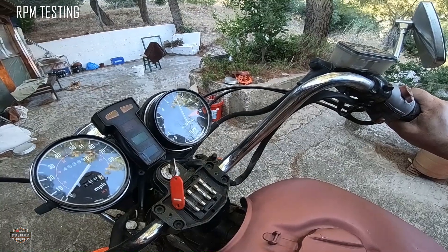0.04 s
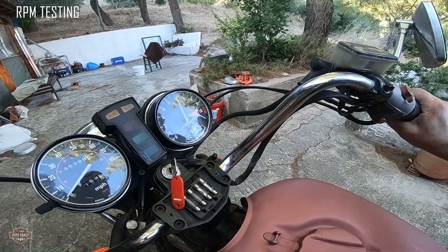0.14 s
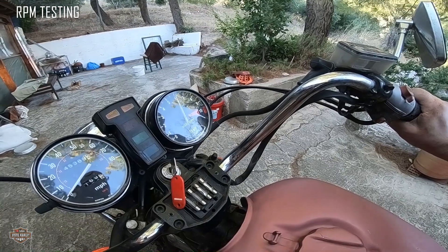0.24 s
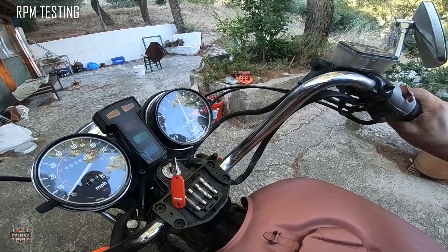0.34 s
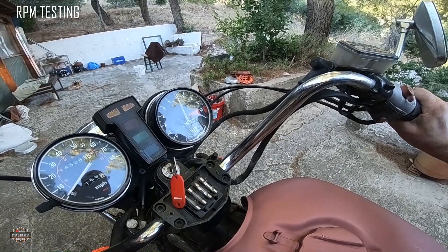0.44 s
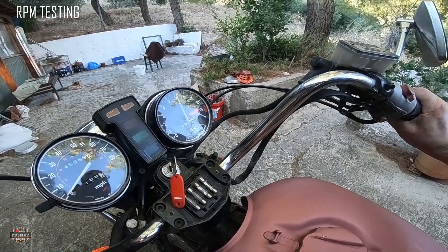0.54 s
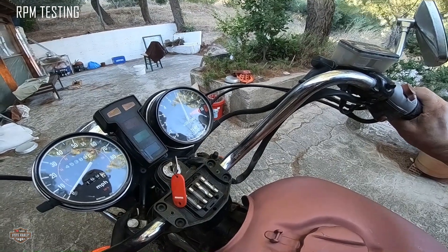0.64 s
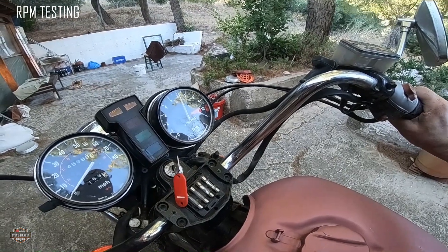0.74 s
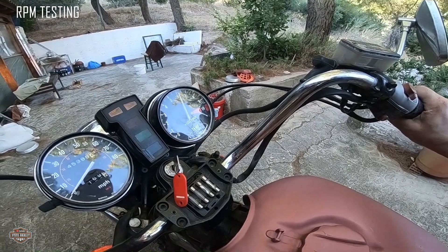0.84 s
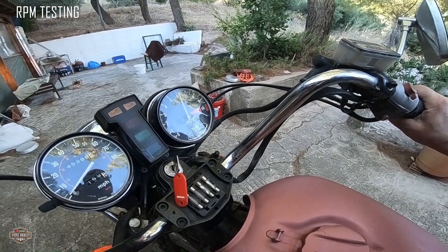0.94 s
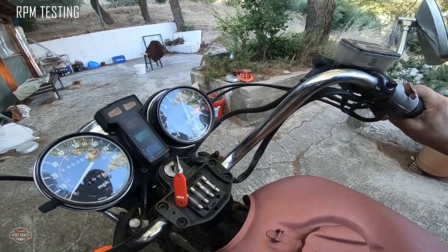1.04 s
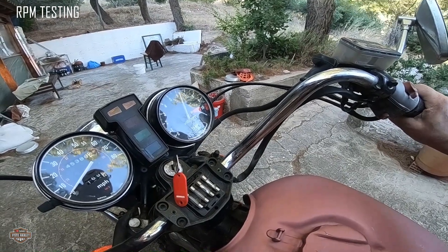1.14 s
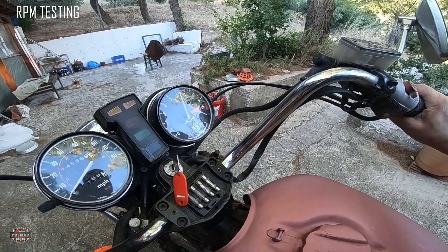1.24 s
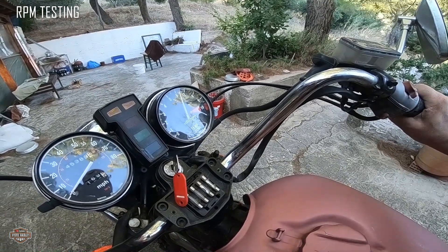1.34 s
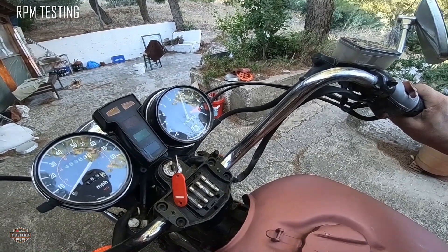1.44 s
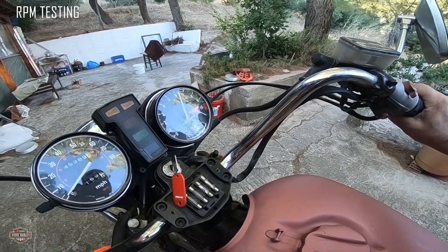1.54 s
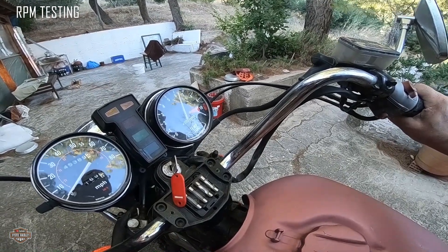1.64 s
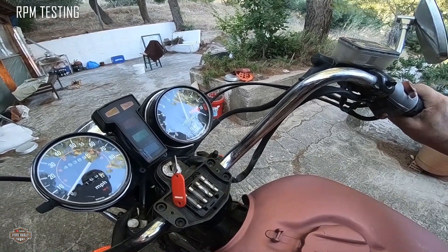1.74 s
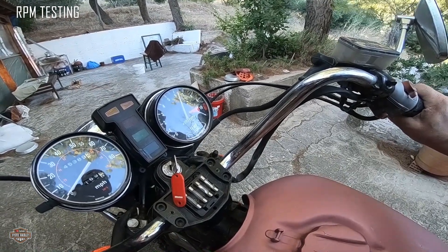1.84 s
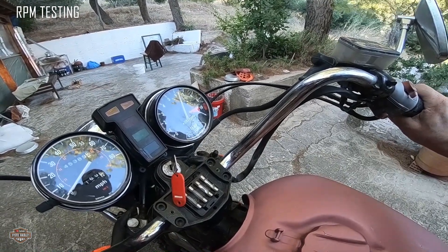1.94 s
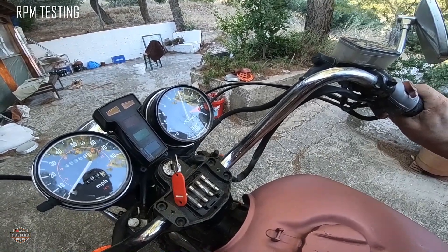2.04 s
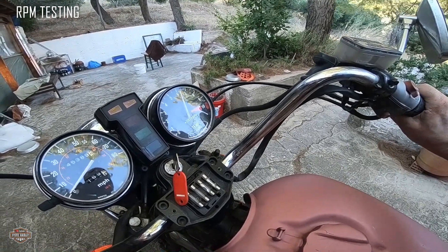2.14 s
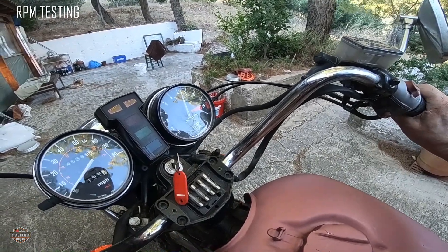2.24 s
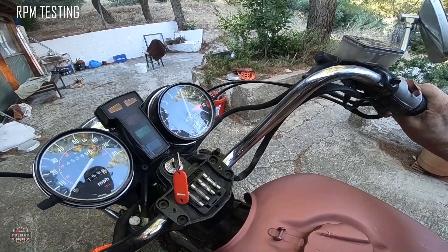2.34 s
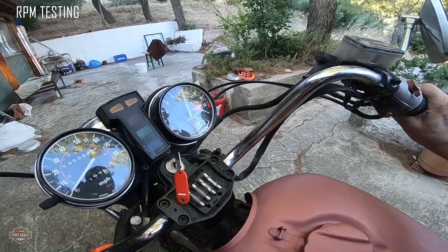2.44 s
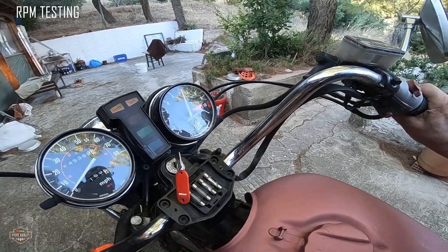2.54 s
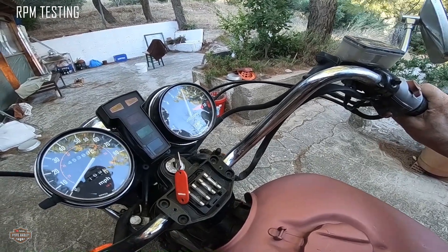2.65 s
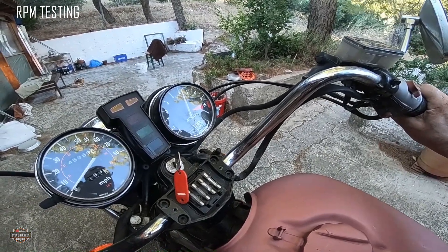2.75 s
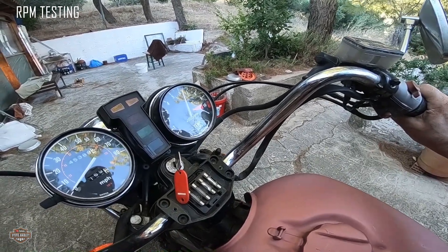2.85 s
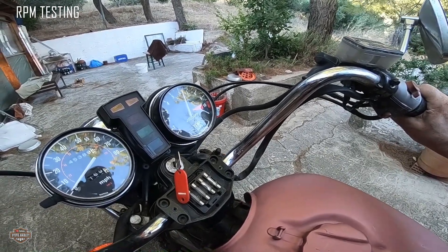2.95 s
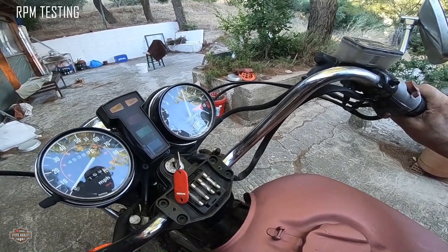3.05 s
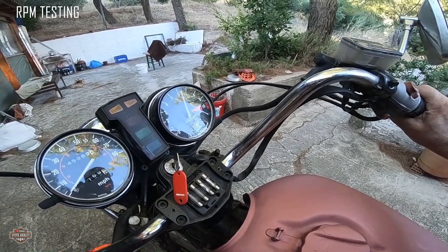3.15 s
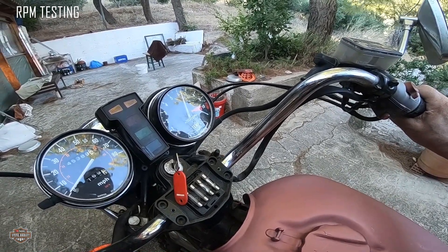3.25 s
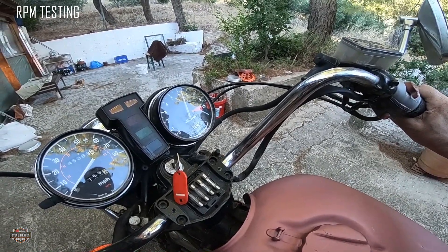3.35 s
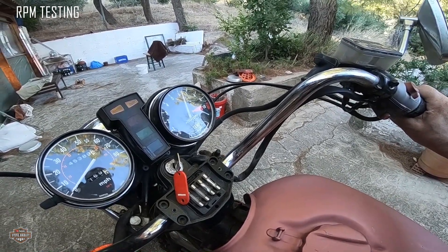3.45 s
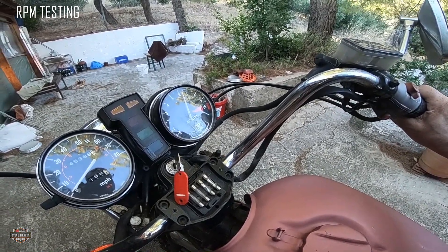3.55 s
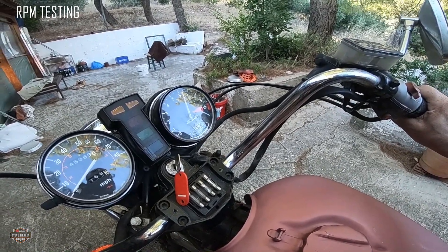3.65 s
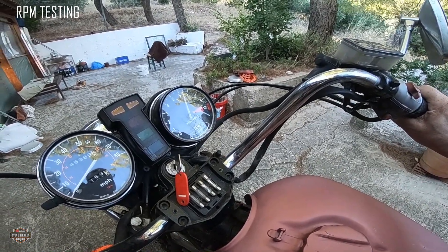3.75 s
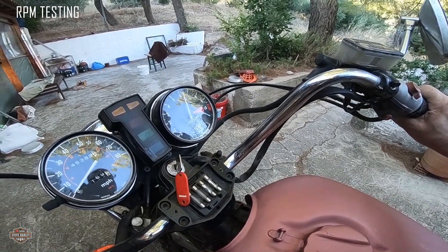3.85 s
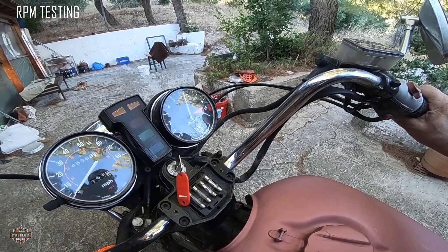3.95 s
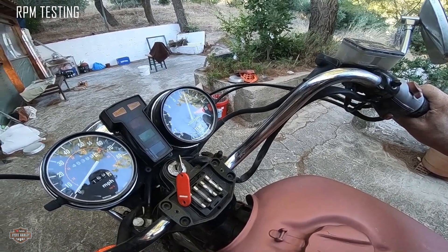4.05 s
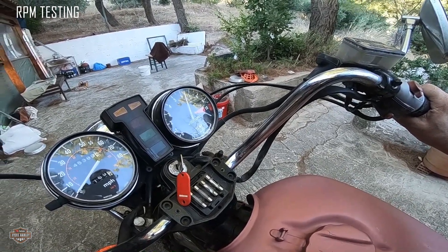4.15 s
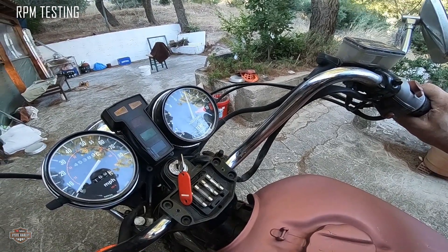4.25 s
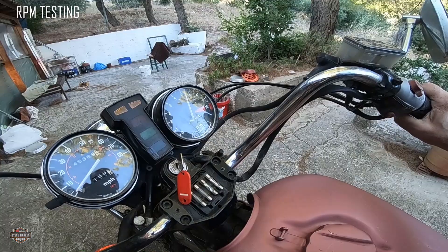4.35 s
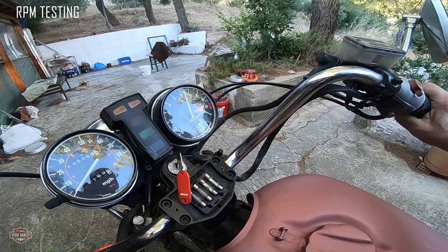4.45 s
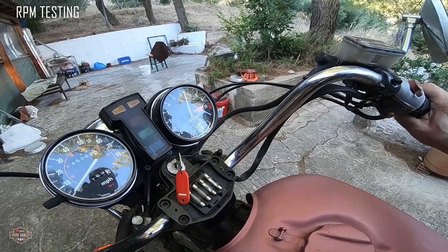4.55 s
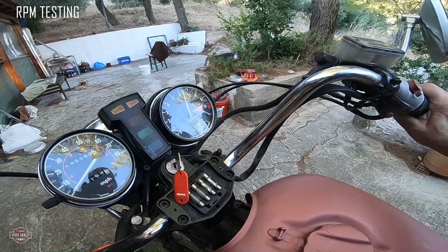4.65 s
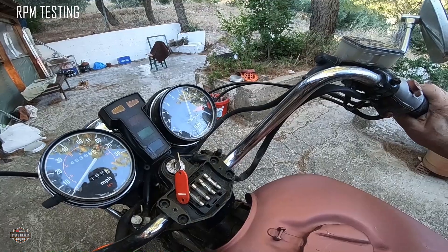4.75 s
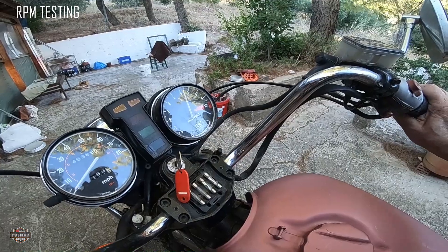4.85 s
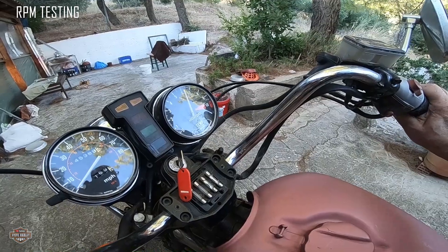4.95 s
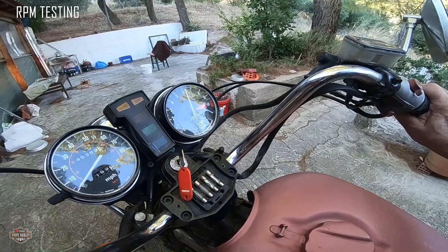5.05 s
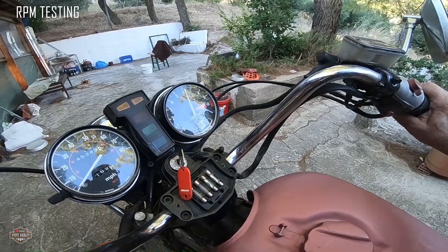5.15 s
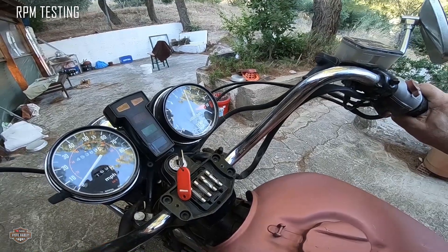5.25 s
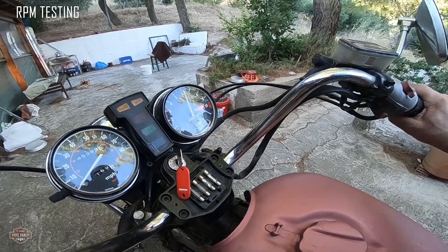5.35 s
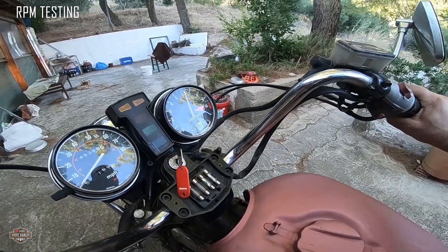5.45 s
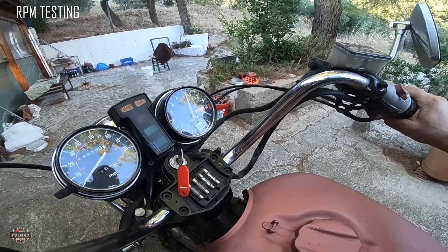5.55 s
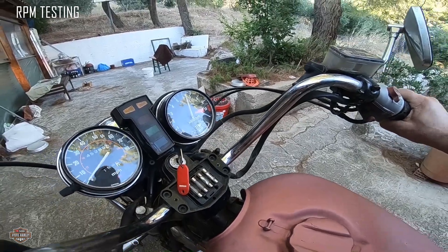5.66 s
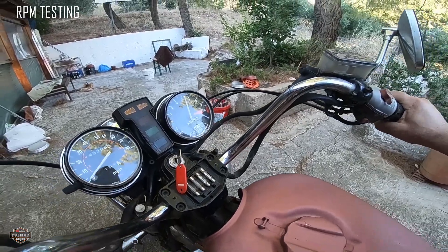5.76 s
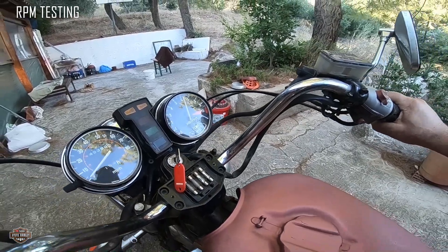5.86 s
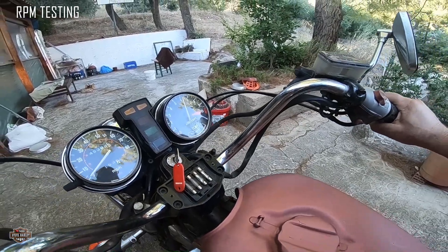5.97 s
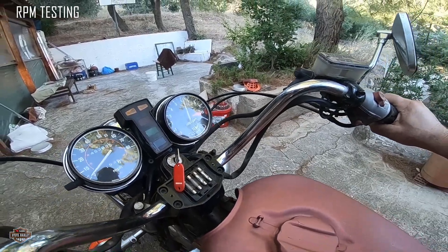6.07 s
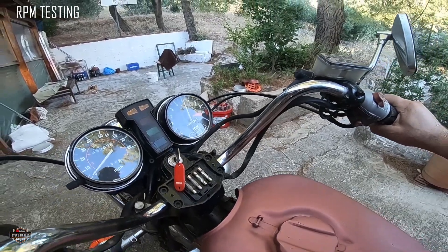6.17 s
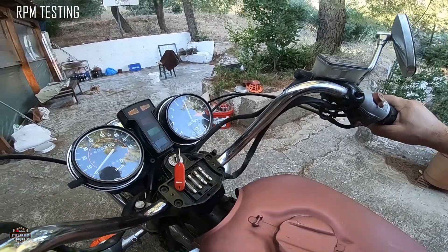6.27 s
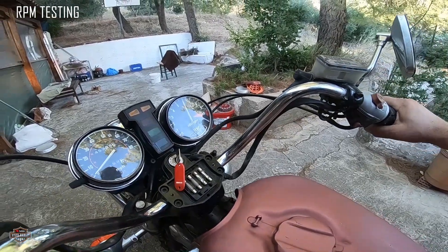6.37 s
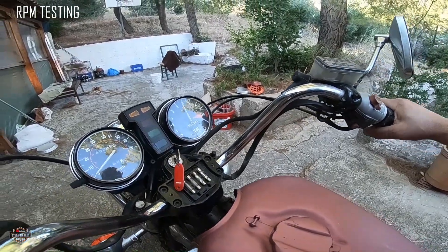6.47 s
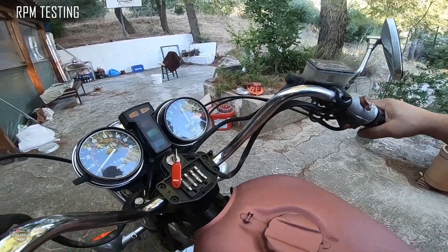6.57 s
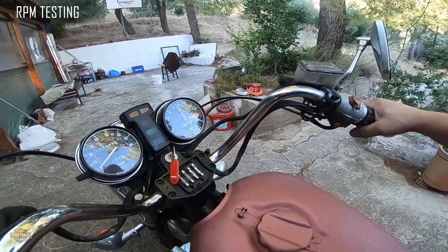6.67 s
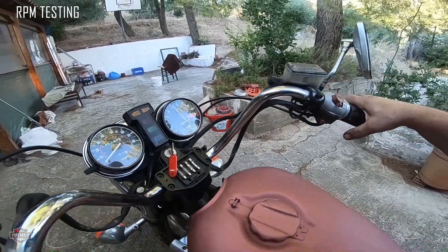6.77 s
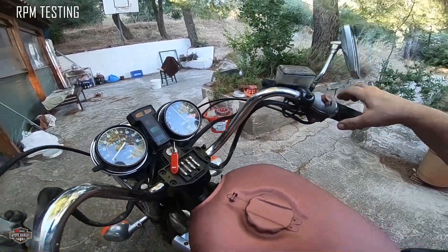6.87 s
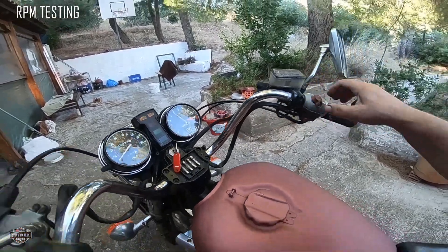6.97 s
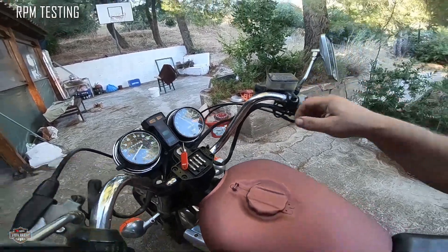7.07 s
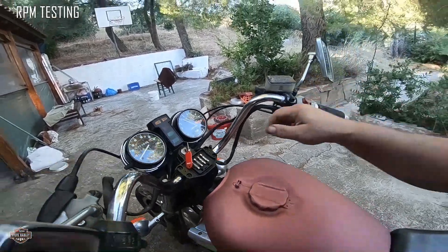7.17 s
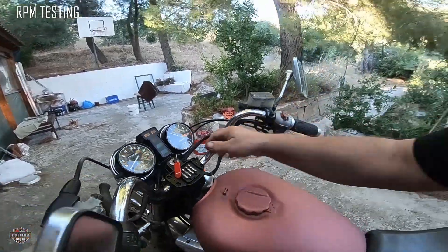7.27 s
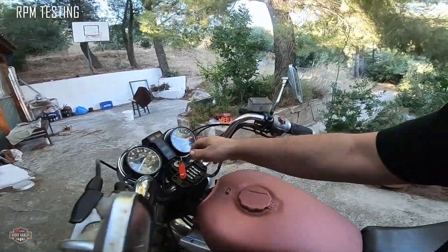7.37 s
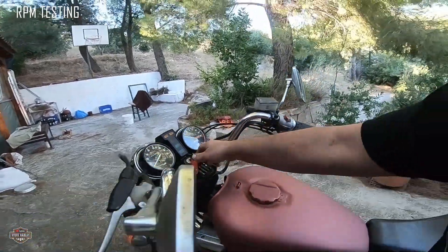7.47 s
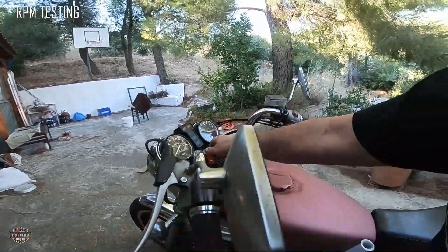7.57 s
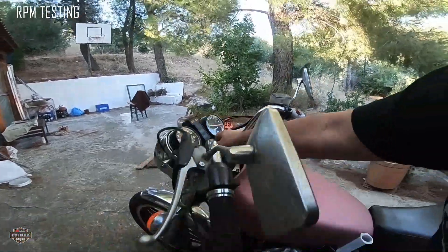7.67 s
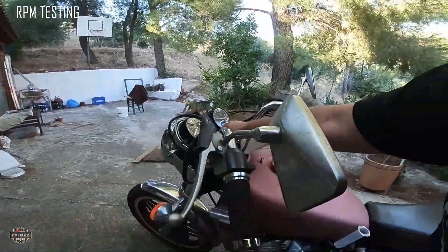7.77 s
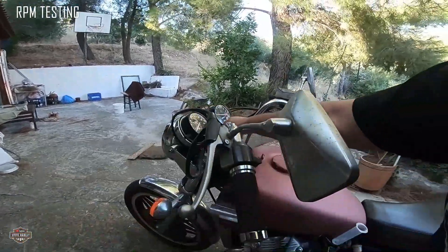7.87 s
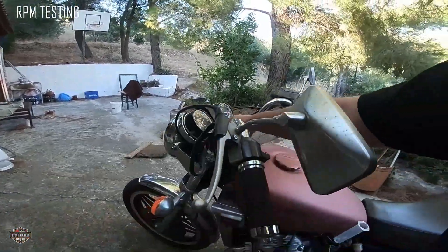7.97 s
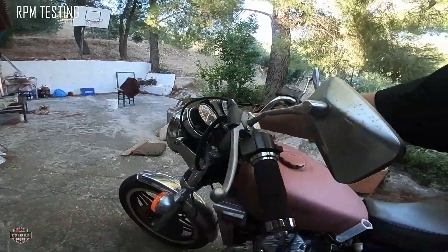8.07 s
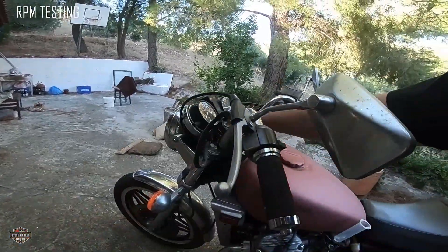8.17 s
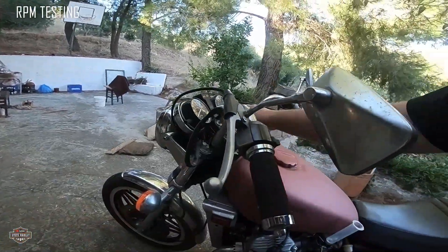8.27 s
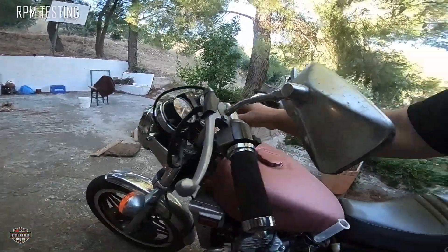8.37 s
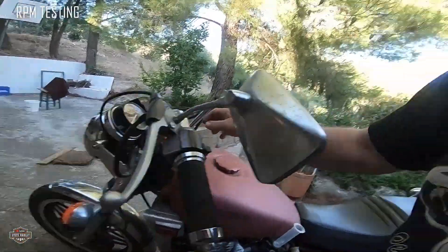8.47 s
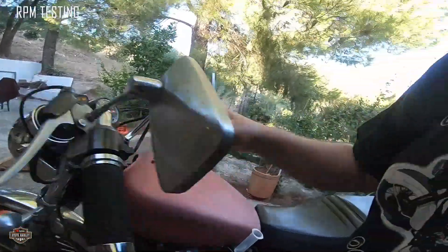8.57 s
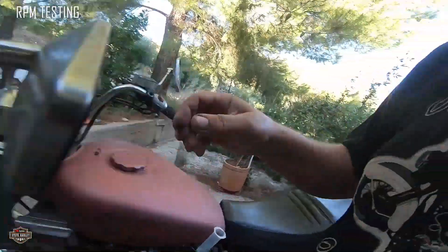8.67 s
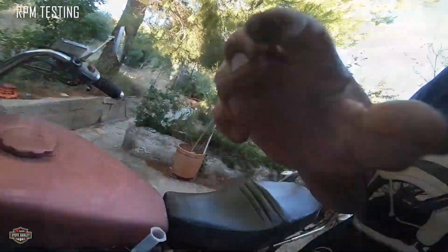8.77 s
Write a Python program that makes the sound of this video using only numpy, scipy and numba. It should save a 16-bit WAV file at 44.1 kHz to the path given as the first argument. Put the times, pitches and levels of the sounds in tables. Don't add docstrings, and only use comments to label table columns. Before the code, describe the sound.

From 0 s a parked twin-cylinder motorcycle engine is already held at high revs, heard very close above its tank outdoors on a stone patio. A thick, low buzzing drone dominates, with valve-gear clatter, airy gas and intake hiss, low rumble, faint chain whine and irregular tiny metallic ticks. Pitch rises slightly over the first second, then wavers, with small stumbles near 1.5 and 2.2 s, a brief surge at 3.4 s, and stumbles at 4.5 and, deepest, 4.8 s, each with a soft thud. From 5.25 to 6 s the microphone steps back and the tone becomes harder, more cracking. Around 6.3 s the throttle shuts; pitch and hiss fall away. By 7.3 s the drone separates into hollow, raspy muffler puffs and low thumps, gradually slowing. A thin cover rattles faintly from 7.6 to 8.5 s, and everything dulls and drops in level as the microphone swings away near 8.4-8.8 s.

```python
import sys
import numpy as np
from scipy import signal
from scipy.fft import rfft, irfft, next_fast_len
from scipy.io import wavfile
from scipy.ndimage import uniform_filter1d
from numba import njit

SR = 44100
rng = np.random.default_rng(int(sys.argv[2]) if len(sys.argv) > 2 else 0)


def int16_out(signal):
    q = np.round(np.clip(np.atleast_2d(signal).T, -1, 1) * 32767)
    wavfile.write(sys.argv[1], SR, q.astype(np.int16))


def amplitude_ratio(level_db):
    exponent = np.asarray(level_db, float) / 20
    return 10 ** exponent


N = 388521
t = np.arange(N) / SR
SHUT_S, PUFFING_S = 6.3, 7.3

# (time [s], speed lost [Hz])
STUMBLES = [
    (1.47, .55),
    (2.19, .95),
    (3.4, -.65),
    (4.52, .75),
    (4.79, 1.9),
]
# (time [s], level [dB])
FACING = [(0, 4), (.3, 3), (.8, 0), (1.5, 0), (3.2, -2.5), (4.3, -1), (4.8, -2), (5.7, 1.5), (6.3, 2.5),
          (6.9, -1), (7.7, -5.5), (8.4, -4.5), (8.53, -11), (8.57, -8.5), (8.81, -15)]


def curves(table):
    s, *columns = np.transpose(table)
    return [np.interp(t, s, c) for c in columns]


def ramp(start_s, seconds):
    return np.clip((t - start_s) / seconds, 0, 1)


def unit(x):
    return x / np.sqrt(np.mean(x ** 2))


def steady(x, seconds=0.099):
    return x / np.sqrt(uniform_filter1d(x ** 2, int(seconds * SR)) + 1e-12)


def walk(rate):
    k = int(SR / rate)
    held = np.repeat(rng.standard_normal(N // k + 1), k)
    return 0.99 * uniform_filter1d(uniform_filter1d(held, k), k)[:N]


def coloured(points):
    size = next_fast_len(N)
    hz, db = np.transpose(points)
    bins_hz = np.arange(1, size // 2 + 2) * SR / size
    gain = amplitude_ratio(np.interp(np.log(bins_hz), np.log(hz), db))
    return unit(irfft(rfft(rng.standard_normal(size)) * gain, size)[:N])


@njit
def svf(x, hz, width):
    y, b, l = np.empty(len(x)), 0., 0.
    g = np.tan(np.pi * hz / SR)
    for i in range(len(x)):
        v = (b + g * (x[i] - l)) / (1 + g * (g + width[i] / hz))
        b, l, y[i] = 2 * v - b, l + 2 * g * v, v
    return y


def ring(x, hz, width):
    return svf(x, 1. * hz, np.full(N, 1. * width)) * width / hz


def kicks(cycle, share, scatter_db):
    turn = np.floor(cycle - share).astype(int)
    size = amplitude_ratio(scatter_db * rng.standard_normal(600))
    return np.diff(turn, prepend=turn[0]) * size[turn - turn[0]]


def speed(puff_s):
    # (time [s], rate [Hz])
    throttle_hand = [(.3, 46.95), (.85, 47.65), (1.15, 49.4), (1.45, 49.4), (1.75, 48.7), (2.35, 48.6),
                     (2.8, 49.05), (3.33, 48.65), (3.9, 49.25), (4.1, 48.75), (4.45, 49.85), (4.75, 49.6),
                     (5.1, 48.4), (5.45, 49.55), (5.75, 48.9), (6.24, 44.6), (6.58, 40.05), (6.97, 30.05)]
    drop_s, recover_s, free_s = .05, .4, 6.97
    puff_hz, drag_per_s = 13.0, .645
    lost = 0
    for s, hz in STUMBLES:
        recovery = np.exp(-np.maximum(t - s, 0) / recover_s)
        lost = lost + hz * ramp(s - drop_s / 2, drop_s) * recovery
    held = curves(throttle_hand)[0] - lost
    return np.where(t < free_s, held, puff_hz * np.exp(-drag_per_s * (t - puff_s)))


def fired_db(order, hz):
    # (multiple of cycle rate, level above the tank [dB], level one step back [dB])
    order_levels = [(1, -36.5, -37), (2, -20.5, -23.5), (3, -27, -36), (4, -28.5, -31.5), (5, -18.5, -14),
                    (6, -11.5, -20.5), (7, -30, -36), (8, -29.5, -33.5), (9, -31.5, -37), (10, -29.5, -32),
                    (11, -53.5, -39.5), (12, -34.5, -30.5), (13, -29, -36), (14, -43.5, -41.5),
                    (15, -50, -34), (16, -42.5, -48.5), (17, -56, -45), (18, -52, -51.5), (19, -61, -42),
                    (20, -57.5, -55.5)]
    # (multiple, slope above the tank [dB per Hz], one step back [dB per Hz])
    flank_slopes = [(2, 0.3, 0.3), (3, 0.8, -3), (4, 0, -0.1), (5, 0.8, 1.26), (6, 0, 0.1)]
    # (centre [Hz], width [Hz], above the tank [dB], one step back [dB])
    case_modes = [(1043, 48, -58, -56), (1258, 93, -51.5, -61.5), (1409, 32, -50, -53.5),
                  (1721, 32, -50.5, -58), (1740, 290, -62, -52.5)]
    held_hz, faint_db, odd_back_db = 48.5, -65.5, -56
    if order <= len(order_levels):
        near, back = {k: v for k, *v in flank_slopes}.get(order, (0, 0))
        _, near_db, back_db = order_levels[order - 1]
        return near_db + near * (hz - held_hz), back_db + back * (hz - held_hz)
    near = amplitude_ratio(faint_db)
    back = amplitude_ratio(odd_back_db if order % 2 else faint_db)
    for f, w, near_db, back_db in case_modes:
        lift = 1 / (1 + (2 * (order * hz - f) / w) ** 2)
        near = near + lift * amplitude_ratio(near_db)
        back = back + lift * amplitude_ratio(back_db)
    return 20 * np.log10(near), 20 * np.log10(back)


def drone(cycle, hz):
    # (time [s], share of the step)
    step_back = [
        (5.25, 0),
        (5.7, .78),
        (6.0, 0.94),
    ]
    # (frequency [Hz], level [dB])
    unfired_colour = [(50, -36.5), (75, -38), (100, -20), (122, -19), (140, -18.5), (172, -30.5),
                      (300, -35.5), (1700, -62.5)]
    # (multiple, lag [radians per Hz])
    order_lags = [(2, 0), (3, -.2), (4, .3), (5, .7), (6, .65)]
    cancelled = 6
    even_db, low_even_db = -11.5, -3.5
    in_step_hz, third_leads = 47.8, 1.75
    misfire_s, misfire_db_per_hz = .06, 3
    boom_lag = .32
    back, = curves(step_back)
    facing_db, = curves(FACING)
    shut = ramp(SHUT_S - .05, 0.29)
    dull_db = np.interp(t, [6.5, 7.1], [0, .6])
    uneven = cycle + (0.0017 + 0.0011 * back + 0.0011 * shut) * walk(30)
    thud_db = sum(misfire_db_per_hz * abs(lost) * np.exp(-((t - s) / misfire_s * 2) ** 2) for s, lost in STUMBLES)
    colour_hz, colour_db = np.transpose(unfired_colour)
    out = 0
    for order in range(1, 43):
        near_db, back_db = fired_db(order, np.maximum(hz, 44))
        fired = near_db + back * (back_db - near_db)
        if order == cancelled:
            fired = 20 * np.log10(np.abs((1 - back) * amplitude_ratio(near_db) - back * amplitude_ratio(back_db)) + 0.0016)
        unfired = np.interp(np.log(order * hz), np.log(colour_hz), colour_db)
        if order % 2 == 0:
            unfired = unfired + (even_db if order > 6 else low_even_db)
        unfired = unfired - dull_db * max(order - 6, 0)

        strong = 1 < order < 7
        if strong:
            wander_db = (0.29 + 2.7 * shut) * walk(6)
        else:
            wander_db = 1.5 * walk(7.1) + 0.08 * order * walk(1.3) + 0.52 * facing_db
        db = fired + shut * (unfired - fired) + wander_db + .5 * walk(25) + thud_db * (order in (3, 4))

        smear, above = .35 * order ** 2, max(order - 5, 0)
        gather = np.angle(np.exp(1j * (.6 * above - .41 * above ** 2 + 1.3))) * (5 < order < 17)
        if strong:
            lag = dict(order_lags)[order] * (np.maximum(hz, 46) - in_step_hz)
            together = third_leads * (order == 3) - lag
            spread = np.angle(np.exp(1j * (smear - 2 * np.pi * order * boom_lag)))
            smear = together + back * spread - back * together
        phase = 2 * np.pi * order * uneven + smear + back * gather
        out = out + amplitude_ratio(db) * np.sqrt(2) * np.cos(phase)
    return out * np.interp(t, [PUFFING_S - .02, PUFFING_S + .02], [1, 0])


def coasting(cycle):
    # (share of cycle, muffler kick [dB], pipe thump [dB])
    valve_events = [
        (0, 8.5, 1),
        (0.361, -10.5, 0.5),
        (0.622, -10, 12),
        (0.796, -19.5, -19),
    ]
    # (time [s], level [dB])
    pipe_fade = [(7.4, 1), (8.0, -2.5), (8.37, -3.5), (8.4, -9), (8.6, -12), (8.81, -15.5)]
    fade_db, = curves(pipe_fade)
    boom_db, rasp_db = -18 + fade_db, -32.5 + 1.5 * fade_db
    push = np.hanning(int(0.0065 * SR))
    kick = thump = 0
    for share, kick_db, thump_db in valve_events:
        train = np.convolve(kicks(cycle, share, scatter_db=1.0), push)[:N]
        kick = kick + amplitude_ratio(kick_db) * train
        thump = thump + amplitude_ratio(thump_db) * train
    choked = (cycle % 1 > .47) & (cycle % 1 < .6)
    muffler = svf(ring(kick, 122, 100), 128., 15 + 130. * choked)
    low_pipe = ring(ring(thump, 65, 24), 41, 56)
    high_pipe = ring(ring(thump, 91.4, 24), 106, 58)
    pipe = unit(low_pipe) + amplitude_ratio(5.0) * unit(high_pipe)
    rasp = ring(kick + thump, 250, 50) + amplitude_ratio(-22.0) * ring(kick - thump, 365, 60)
    rasp = ring(rasp, 290, 250)
    rough = ring(ring(rng.standard_normal(N), 290, 160), 290, 210)
    rough = rough * amplitude_ratio(1.9 * np.cos(2 * np.pi * (cycle - .1)))
    apart = np.interp(t, [PUFFING_S - .02, PUFFING_S + .02], [0, 1])
    shut = np.interp(t, [SHUT_S - .05, SHUT_S], [0, 1])
    boom = steady(unit(muffler) + amplitude_ratio(-4.5) * pipe)
    rasping = apart * amplitude_ratio(-3.5) * steady(rasp) + shut * amplitude_ratio(-6.5) * unit(rough)
    return apart * amplitude_ratio(boom_db) * boom + amplitude_ratio(rasp_db) * rasping


def gear(cycle, hz):
    # (centre [Hz], width [Hz], level [dB])
    clatter_modes = [(702, 28, 15.5), (940, 1060, 3.5), (1406, 310, 0), (1440, 130, -7.5), (1780, 340, 6),
                     (2015, 260, 0.5), (2380, 1300, -9), (2340, 70, -9)]
    # (frequency [Hz], level [dB per Hz])
    hiss_colour = [(1500, -25.5), (2500, -4), (3100, -5.5), (4000, -3.5), (4600, -6), (6200, -1.5),
                   (6900, -14), (7600, -18.5), (9000, -33), (16000, -50)]
    # (frequency [Hz], level [dB per Hz])
    air_colour = [(5000, -34.5), (7000, 1), (9200, -4.5), (9800, -12), (11000, -23), (12000, -7),
                  (14000, -11), (15600, -14.5), (16000, -54)]
    # (frequency [Hz], level [dB per Hz])
    rumble_colour = [(15, -29.5), (25, -25), (91, -9.5), (192, -10.5), (291, -7), (345, -11), (629, -15.5),
                     (1000, -38.5), (1300, -68.5), (2200, -120)]
    knock_lag = .45
    whine_hz, whine_width_hz, whine_db = 1770, 300, -43
    facing_db, = curves(FACING)
    clatter_db = -39 + facing_db
    hiss_db = -53 + 0.8 * facing_db - 3.5 * ramp(SHUT_S, 0.5)
    slow = np.interp(t, [6.5, 7.8], [0, 1])
    late = cycle - knock_lag * (1 - slow)
    once, thrice = np.cos(2 * np.pi * late), np.cos(6 * np.pi * late)

    beat = amplitude_ratio((1.4 + 1.6 * slow) * once + (1.4 + slow) * thrice + .9 * walk(14))
    knocks = kicks(late, .1, scatter_db=2.5) + kicks(late, .45, scatter_db=2.5)
    drive = unit(beat * rng.standard_normal(N)) + amplitude_ratio(-3) * (1 - 0.52 * slow) * steady(knocks)
    clatter = 0
    for k, (mode_hz, width, db) in enumerate(clatter_modes):
        clatter = clatter + (-1) ** k * amplitude_ratio(db) * ring(ring(drive, mode_hz, width), mode_hz, 2 * width)

    puff = amplitude_ratio((.8 + 1.7 * slow) * once + 1.5 * slow * thrice + .9 * walk(10))
    hiss = amplitude_ratio(hiss_db) * coloured(hiss_colour)
    air = amplitude_ratio(1.4 * (hiss_db + 56.0) - 64.5) * coloured(air_colour)

    resonance = 1 / (1 + (140 * hz - 2 * whine_hz) ** 2 / whine_width_hz ** 2) ** 2
    teeth = np.sin(140 * np.pi * (cycle + .0015 * walk(60)))
    whine = amplitude_ratio(whine_db + 2 * walk(30)) * resonance * teeth
    rumble = amplitude_ratio(clatter_db + 1.0) * coloured(rumble_colour)
    return amplitude_ratio(clatter_db) * unit(clatter) + puff * (hiss + air) + np.sqrt(2) * whine + rumble


def cover(cycle):
    patches = amplitude_ratio(1.0 * walk(25) + 4 * np.cos(2 * np.pi * (cycle - .7)))
    shaken = .25 + .75 * ramp(7.55, .12) - .75 * ramp(8.54, .03)
    rattle = ring(ring(rng.standard_normal(N), 1430, 61), 1430, 120)
    return amplitude_ratio(-50) * shaken * unit(patches * rattle)


def trim(cycle):
    # (time [s], peak level [dB])
    loud_ticks = [(0.1296, -46), (0.173, -41), (0.4288, -50.5), (0.8935, -52.5), (0.9643, -49.5),
                  (1.0772, -51), (1.2325, -52.5), (1.8741, -49.5), (1.9892, -45.5), (2.2052, -59),
                  (2.412, -48), (2.5167, -46), (2.6405, -55.5), (2.7556, -52.5), (2.827, -48.5),
                  (2.9694, -51), (3.2151, -46.5), (3.2777, -55), (3.3792, -51), (3.4007, -55),
                  (4.0536, -57.5), (4.4373, -49.5), (4.556, -50), (5.1213, -54), (5.143, -48),
                  (5.2065, -57.5)]
    hits = amplitude_ratio(-57) * kicks(cycle, .3, scatter_db=7.5) * (1 - ramp(5.4, .8))
    s, db = np.transpose(loud_ticks)
    hits[(s * SR).astype(int)] = amplitude_ratio(db + 9)
    decay = np.exp(-np.arange(400) / SR / 0.0031)
    burst = np.convolve(hits, decay)[:N] * rng.standard_normal(N)
    return amplitude_ratio(7.5) * ring(ring(burst, 9000, 600), 8900, 1000)


def scene():
    puff_s = 8.266
    hz = speed(puff_s)
    cycle = np.cumsum(hz) / SR
    cycle = cycle - cycle[int(puff_s * SR)]
    mix = drone(cycle, hz) + coasting(cycle) + gear(cycle, hz) + cover(cycle) + trim(cycle)
    return mix[None]


def band_limit(x):
    return signal.sosfilt(signal.butter(12, 15700, fs=SR, output="sos"), x)


def record(dry):
    rounded = np.tanh(0.59 * dry) / 0.61
    return band_limit(rounded)


dry = scene()
out = record(dry)
int16_out(out)
```